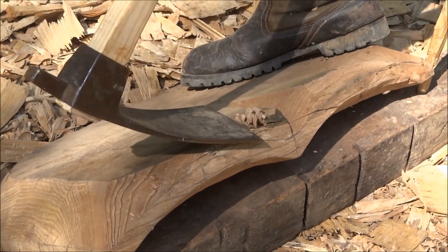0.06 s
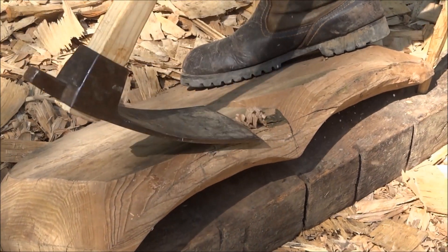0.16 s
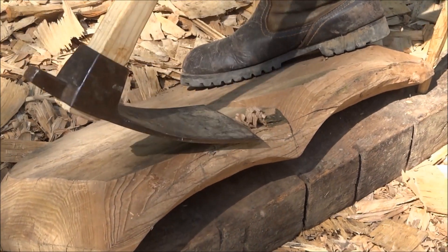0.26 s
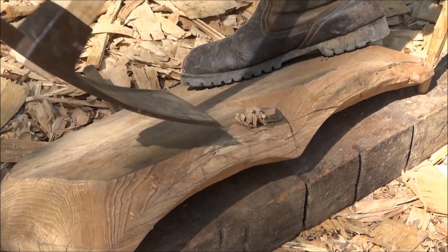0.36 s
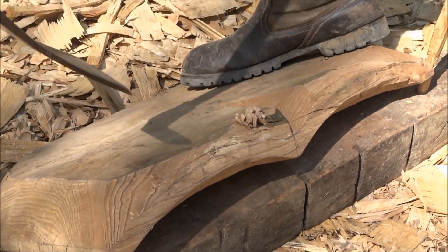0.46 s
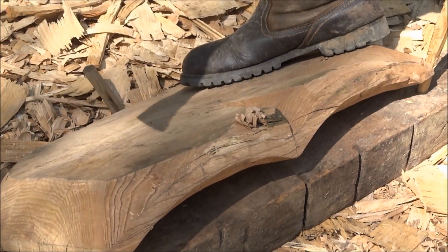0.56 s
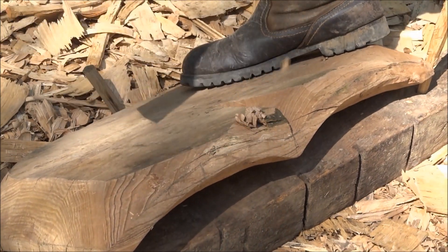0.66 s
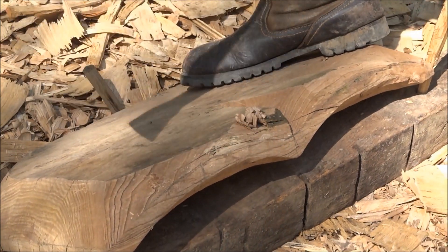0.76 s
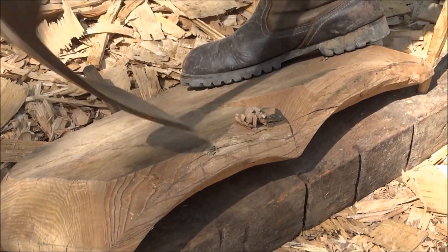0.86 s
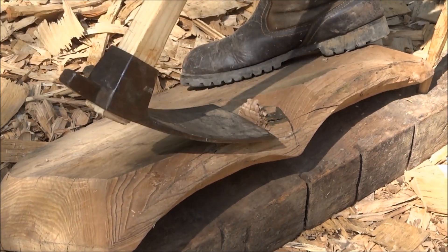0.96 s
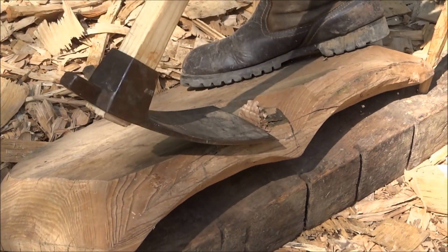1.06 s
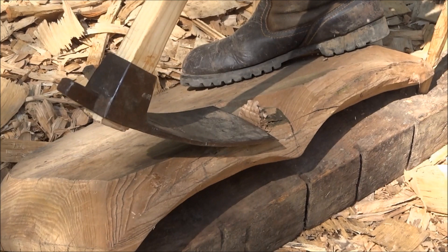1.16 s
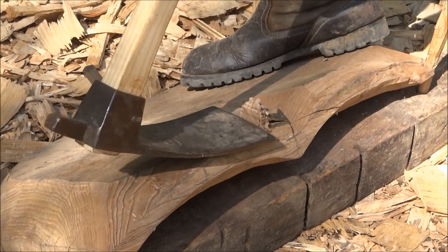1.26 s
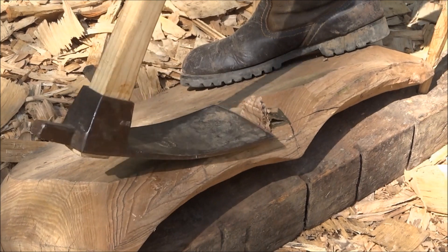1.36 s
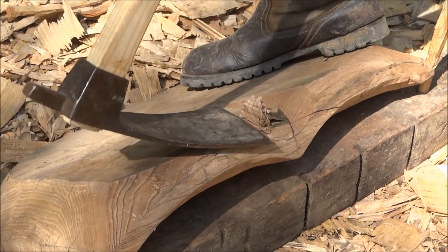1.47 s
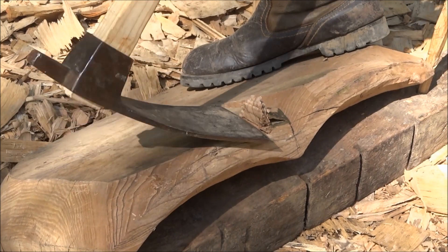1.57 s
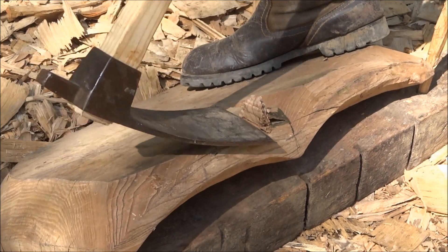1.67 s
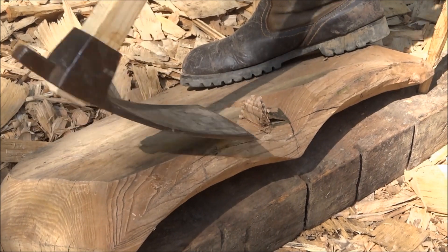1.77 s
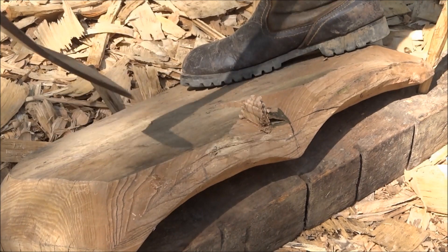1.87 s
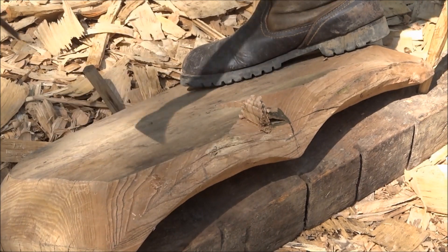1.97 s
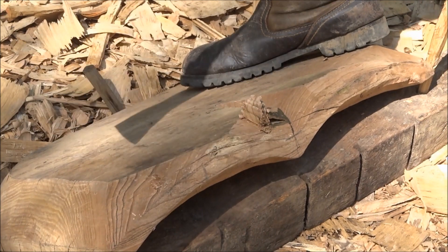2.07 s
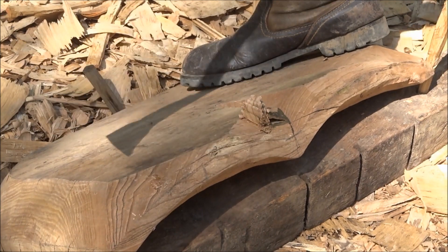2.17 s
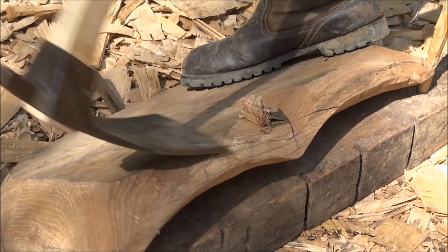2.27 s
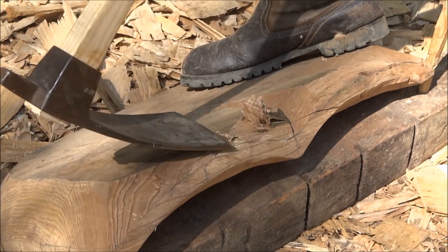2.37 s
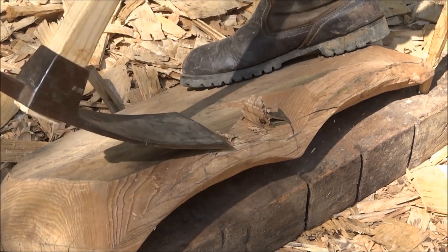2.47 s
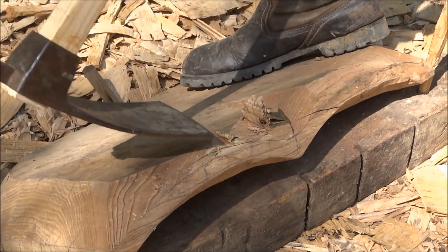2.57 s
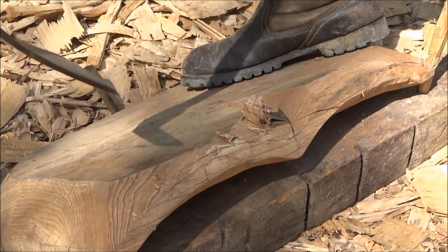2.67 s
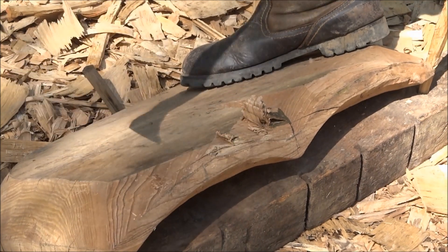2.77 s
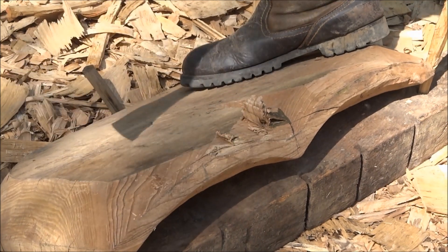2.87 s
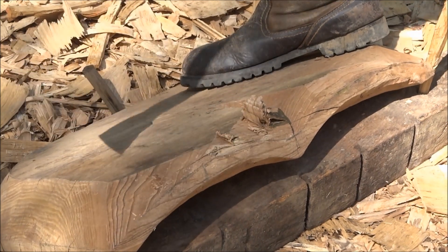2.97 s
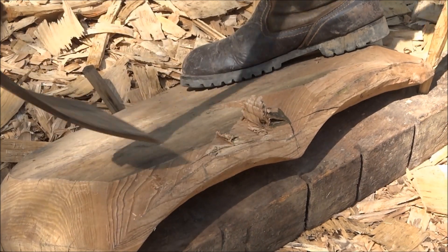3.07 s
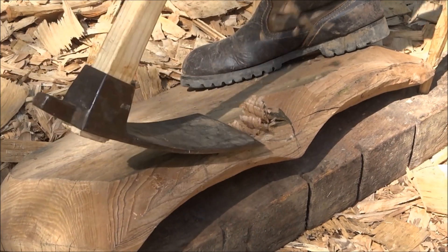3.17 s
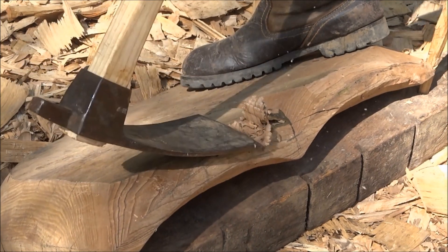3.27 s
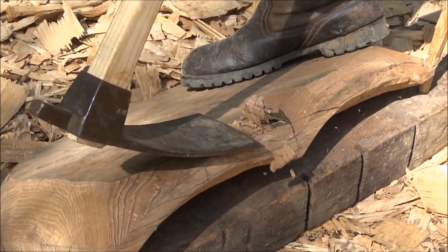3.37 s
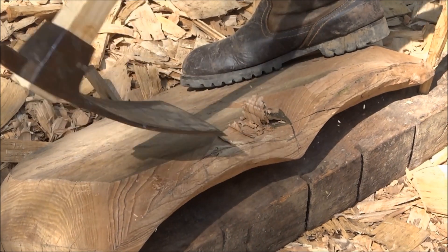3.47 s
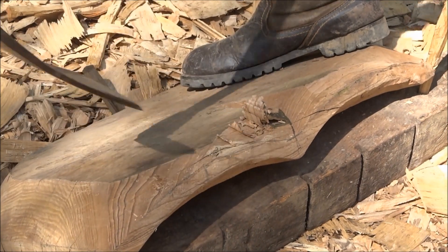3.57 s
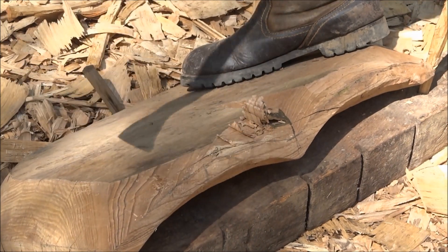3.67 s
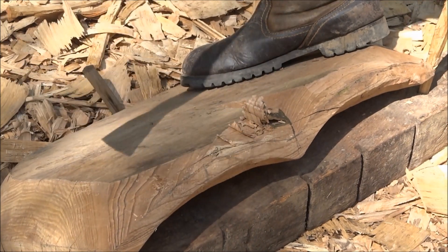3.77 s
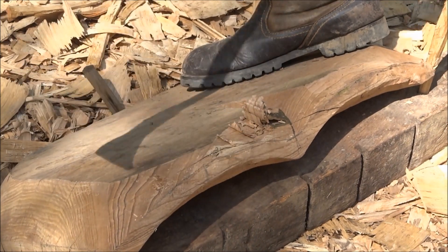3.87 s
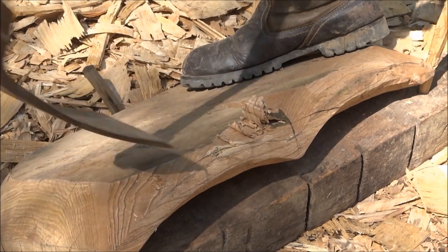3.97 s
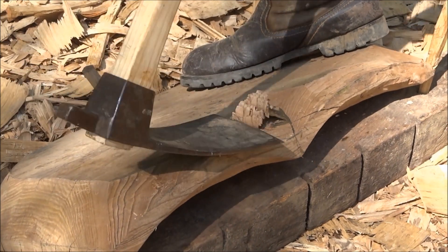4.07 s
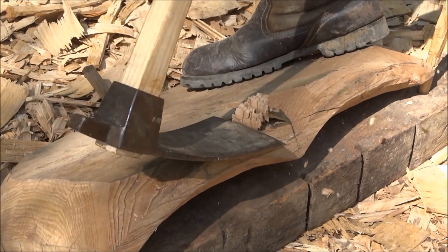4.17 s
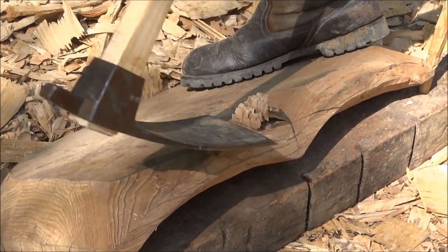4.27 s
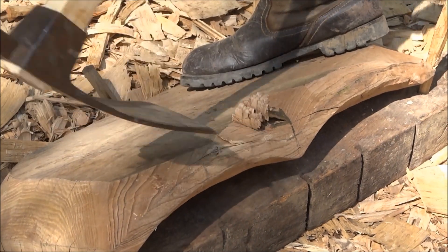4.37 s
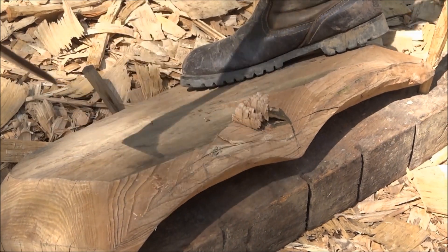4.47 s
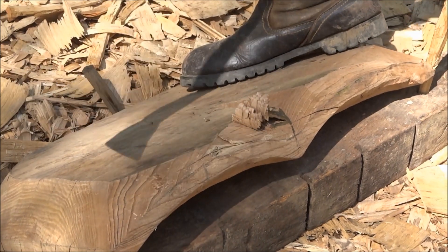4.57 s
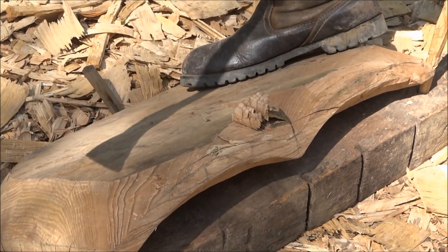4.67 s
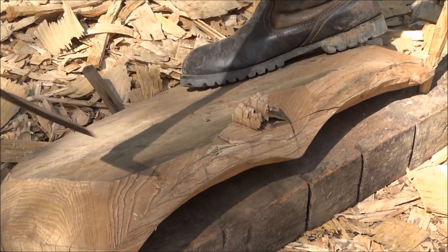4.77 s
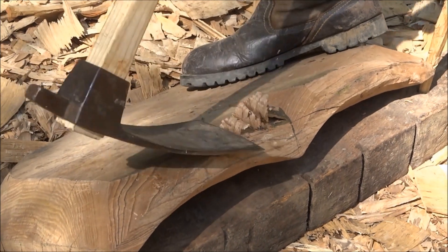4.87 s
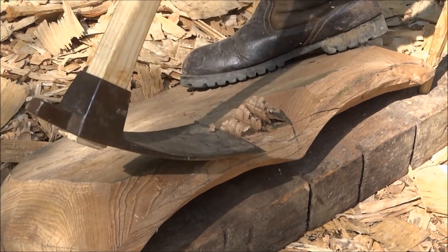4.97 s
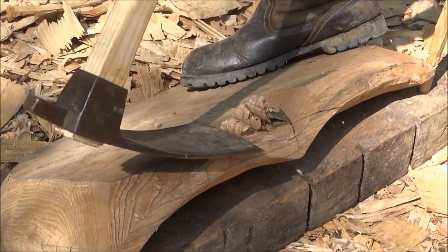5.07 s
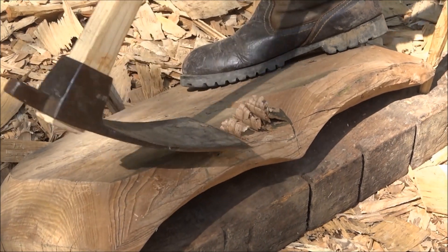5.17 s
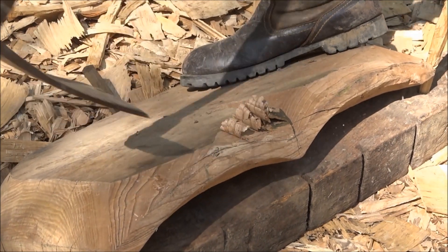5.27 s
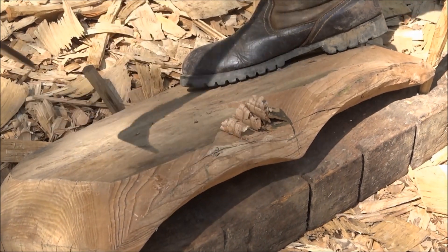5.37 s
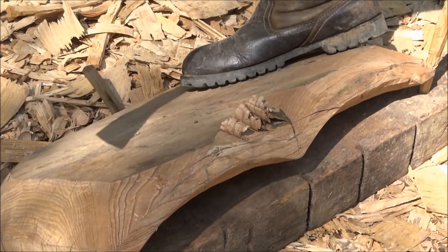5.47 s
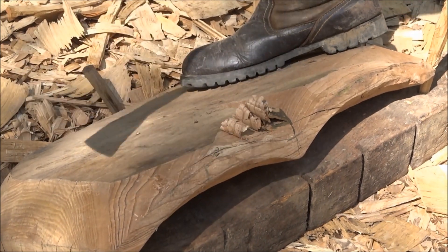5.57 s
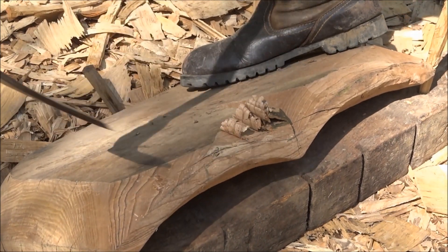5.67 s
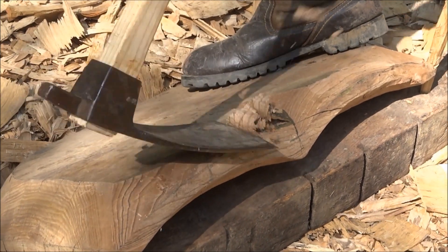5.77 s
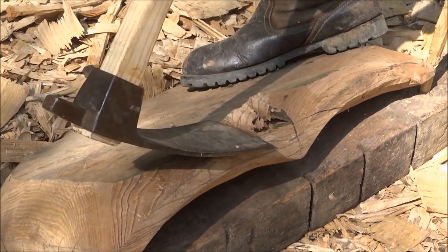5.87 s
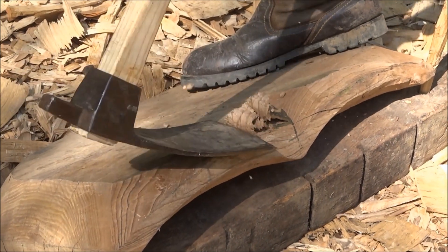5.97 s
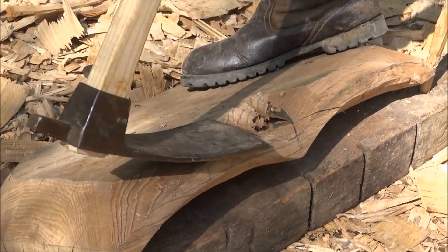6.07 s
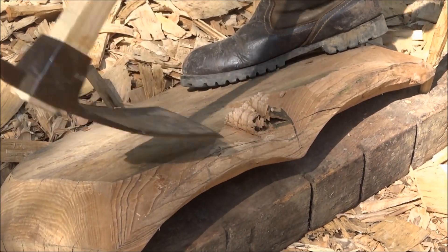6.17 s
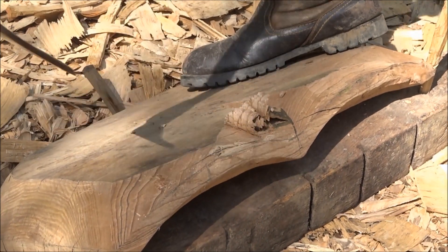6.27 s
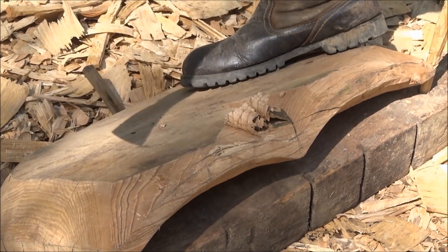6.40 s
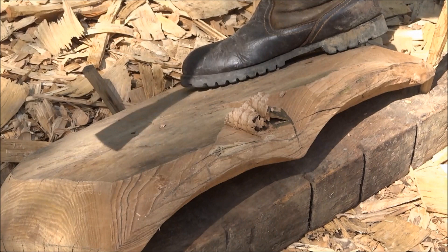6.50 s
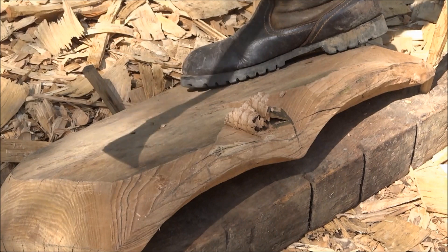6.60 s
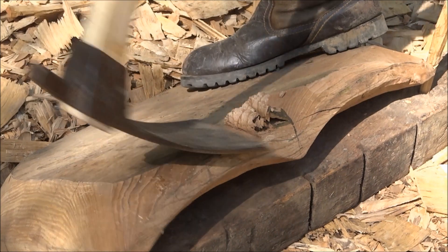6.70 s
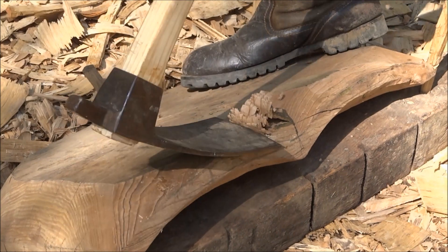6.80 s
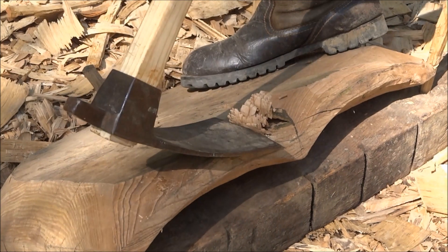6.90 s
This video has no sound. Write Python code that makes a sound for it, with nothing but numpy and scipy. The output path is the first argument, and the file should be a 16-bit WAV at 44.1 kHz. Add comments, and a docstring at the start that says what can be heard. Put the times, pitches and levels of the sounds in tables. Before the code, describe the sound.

Outdoors, close to the work, an adze blow is landing at 0 s: a gritty tear of fibres and a low, damped board thud. The loose board chatters hollowly at 0.1-0.3 s, with a bright crack at 0.36. The second blow falls at 0.9; around 1.3 a splinter tears away in a harsh creak and very sharp cracks, followed by low rubs. Further blows come at 2.3, 3.2, 4.0, 4.9, 5.8 and a heaviest one at 6.7, with another softer board rattle after 3.2 and small snaps and crumb ticks between. Thin distant birds trill from 0.5 to 1.7, then whistle sparsely. From 5.0 a near songbird swells into quick rising chirps, with thin high notes around 5.5-5.7, looping notes from 6.0 and a falling flourish at 6.8. Faint low air and leaf hiss remain; a wall and trees return dull, soft echoes.

```python
"""A hand adze chops a thick board held down on a beam, outdoors: noise tears as fibres part, then the board thuds.
Twice the loose board chatters and rings, as a sum of fading tones; wood cracks sharply in short bursts of noise.
A long splinter tears free, the work rubs under the boot, and crumbs of wood tick among the shavings.
A songbird whistles bending notes close by and others sing farther off, over a faint background of coloured noise.
A wall gives dull echoes, and the yard and trees answer with fading noise tails."""
import sys
import numpy as np
from scipy import signal
from scipy.fft import rfft, irfft, next_fast_len
from scipy.io import wavfile
from scipy.ndimage import map_coordinates

SR = 44100
rng = np.random.default_rng(int(sys.argv[2]) if len(sys.argv) > 2 else 0)


def to_wav(sig):
    """Store sig (one row per channel, or 1-D mono) as 16-bit WAV at the path in sys.argv[1].

    Samples outside -1..1 are clipped; the rate is SR.
    """
    pcm = np.clip(np.atleast_2d(sig), -1, 1) * 32767
    pcm = np.round(pcm).astype(np.int16)
    wavfile.write(sys.argv[1], SR, pcm.T)  # frames by channels


N = 306054  # length in samples

# The blows of the adze. Each row: time the blade enters in seconds, cutting time in seconds, crackle level in dB,
# extra force in dB, time from thud to bounce in seconds, bounce level against the thud in dB.
BLOWS = [(-.009, .0089, -14, 0, .015, -12), (.9093, .011, -18, .5, .011, -2.5),
         (2.3273, .010, -12, .3, .0108, -7), (3.158, 0.014, -12.5, -.5, .01, -7),
         (4.0405, .012, -14.5, -3, 0.0081, 1.5), (4.869, 0.0131, -14, .7, 0.0164, -12),
         (5.777, 0.0098, -14, -.5, .017, -11), (6.728, 0.011, -12.5, 5, .0135, -17.5)]
# The wood around the cut, as a noise colour. Each row: frequency in Hz, relative level in dB.
KNOCK = [(20, -38), (60, -2.5), (150, -9.5), (270, -14), (370, -2), (480, -2), (680, 2), (950, -2.5),
         (1120, -9.5), (1400, -4.5), (1900, -17.5), (4000, -19), (8000, -64)]
# The steel blade, damped by the wood. Each row: frequency in Hz, level in dB, seconds to fade by 60 dB.
STEEL = [(1321, -5, 0.066), (1515, -4.5, 0.13), (2555, -4.5, .12), (3930, 1, 0.12), (5750, -6, 0.066),
         (6800, -9, 0.13)]

# Bird syllables, each made of a few whistled arcs. Each row: start within the syllable in seconds, length in seconds,
# start, middle and end pitch in Hz, level in dB, depth of the buzz as a share of the pitch.
CHIP = [(0, .017, 4750, 4450, 2850, -1.5, 0), (.015, .013, 3800, 4650, 5050, -3, 0.02)]
RISE = [(0, .022, 2950, 3450, 4100, -3.5, 0), (.009, .028, 3700, 4250, 4200, 2, 0.0046)]
LOOP = [(0, .029, 4350, 4100, 3650, -1.5, 0.12), (.019, .031, 3600, 2820, 2330, -2.5, .025),
        (.054, .04, 2980, 3260, 3080, -.3, .018)]
FLOURISH = [(0, 0.0199, 2900, 4400, 4500, -1.5, 0), (.015, .022, 4210, 3700, 3680, 0.5, 0.085),
            (.034, .035, 2950, 3150, 2350, -0.5, 0), (.06, .05, 2700, 2304, 2000, -10.5, 0.065)]
SWEEP = [(0, .026, 5700, 6500, 6550, 1, .06), (.016, .032, 6900, 4750, 3700, 1, .06)]
SEEP = [(0, .072, 8100, 7130, 7900, 0, 0)]
SLUR = [(0, .075, 7300, 6750, 6200, 0, 0)]
WHISTLE = [(0, .04, 3000, 3060, 3050, 0, 0), (.02, .08, 3050, 3030, 2990, -3.5, 0)]
DIP = [(0, .018, 4480, 4370, 4150, -4, 0), (.011, .035, 4100, 3720, 3550, 0, .018)]

TOP_HZ = 16424  # nothing sounds above this pitch


def amp(db):
    """Turn decibels into a gain."""
    return 10 ** (np.asarray(db) / 20)


def unit(x):
    """Scale to an average strength (rms) of 1."""
    return x / np.sqrt(np.mean(x ** 2) + 1e-20)


def along(points, hz):
    """Read a curve of (Hz, value) points, with frequency on a logarithmic axis."""
    f, v = np.transpose(points)
    return np.interp(np.log(hz + 1), np.log(f + 1), v)


def add(track, s, x):
    """Mix x into the track from second s on, leaving out what falls outside."""
    i = round(s * SR)
    x = x[max(-i, 0):N - i]
    track[max(i, 0):][:len(x)] += x


def filtered(x, response):
    """Multiply the spectrum of x by a response that depends on frequency."""
    n = x.shape[-1]
    m = next_fast_len(n + 8192)  # spare room, so delayed sound does not wrap round to the start
    return irfft(rfft(x, m) * response(np.fft.rfftfreq(m, 1 / SR)), m)[..., :n]


def noise(spectrum, size):
    """Noise coloured by a spectrum, with an rms of 1."""
    white = rng.standard_normal(size)
    return unit(filtered(white, lambda hz: amp(along(spectrum, hz))))


def resonance(x, hz, q):
    """Pass x through one damped resonance, which favours sound near hz; a high q is narrow."""
    return filtered(x, lambda f: 1j * f * hz / q / (hz * hz - f * f + 1j * f * hz / q))


def wobble(rate, size):
    """A smooth random curve through rate random points a second."""
    points = rng.standard_normal(int(size * rate / SR) + 4)
    return map_coordinates(points, [np.arange(size) * rate / SR])


def ring(modes, t, scatter_db=2, detune=0.0092):
    """Sum the fading tones of a struck body, with new strengths and slightly new pitches for every contact."""
    total = 0
    for hz, db, t60 in modes:
        fade = amp(db + rng.normal(0, scatter_db) - 60 * t / t60)
        total = total + fade * np.sin(2 * np.pi * hz * rng.normal(1, detune) * t)
    return total


def spread(pair, width):
    """Turn a middle and a side signal into left and right."""
    middle, side = pair
    return np.array([middle + width * side, middle - width * side])


def reverb(x, decay, delay, width):
    """A diffuse answer: a noise tail in which each frequency dies away at its own speed."""
    hz, t, z = signal.stft(rng.standard_normal((2, SR)), SR, nperseg=256)
    fade = amp(-60 * t / along(decay, hz)[:, None])
    tail = signal.istft(z * fade, SR, nperseg=256)[1]
    tail = np.pad(tail / np.linalg.norm(tail[0]), ((0, 0), (int(delay * SR), 0)))
    return signal.fftconvolve(x[None], spread(tail, width), axes=1)[:, :N]


def wall(x, delay, dull_hz):
    """One reflection from a flat surface: x comes later and duller."""
    return filtered(x, lambda f: np.exp(-2j * np.pi * f * delay) / (1 + 1j * f / dull_hz))


def breeze():
    """Low outdoor rumble and leaf hiss, made of coloured noise that slowly swells and sinks."""
    # Colour of the air noise. Each row: frequency in Hz, relative level in dB.
    air = [(12, -52.5), (20, -15.5), (94, 0.5), (571, -20), (966, -19.5), (1210, -25.5), (1640, -21),
           (2220, -25), (3970, -24), (5240, -26.5), (6720, -23.5), (8860, -33), (11700, -29), (15000, -37)]
    # Course of the background loudness; the louder start is probably the first blow dying away.
    # Each row: time in seconds, level in dB.
    levels = [(0, -39), (.7, -45), (1.4, -45), (2.1, -48.5), (2.901, -47.5), (3.8, -45), (4.6, -45),
              (6.94, -46.5)]
    # Breadth of the outdoor air. Each row: frequency in Hz, side to middle ratio before the overall width.
    breadth = [(60, 0.023), (250, 0.32), (1000, 1), (5000, 0.52), (9000, 0.091)]
    level = np.interp(np.arange(N) / SR, *np.transpose(levels)) + .9 * wobble(5, N)
    side = filtered(noise(air, N), lambda hz: along(breadth, hz))
    return amp(level) * spread([noise(air, N), side], width=0.86)


def arc(length, pitches, buzz, waver, flutter_db):
    """One whistle that swells and fades while its pitch bends smoothly, never twice quite the same."""
    buzz_hz = 190.7
    overtone_hz, overtone_width = 4300, .12  # the throat favours the third harmonic of notes near this pitch
    fullness = 0.79  # lower values bring the arc to full voice sooner
    t = np.arange(int(length * SR)) / SR
    u = t / length  # runs from 0 to 1 over the arc
    bend = np.polyval(np.polyfit([0, .5, 1], np.log(pitches), 2), u)  # curve through the three pitches
    quiver = buzz * np.sin(2 * np.pi * (buzz_hz * t + rng.random()))
    pitch = np.exp(bend + quiver + waver * wobble(313, len(t)))
    phase = 2 * np.pi * np.cumsum(pitch) / SR
    second = np.sin(2 * phase) * (2 * pitch < TOP_HZ)
    third = np.sin(3 * phase) * (3 * pitch < TOP_HZ)
    favour = 1 / (1 + (np.log(pitch / overtone_hz) / overtone_width) ** 2)
    tone = np.sin(phase) + amp(-36.5) * second + amp(-28) * third * favour
    return tone * amp(flutter_db * wobble(242, len(t))) * np.sin(np.pi * u) ** fullness


def trills(rows):
    """Repeat each syllable evenly while it swells; gives (syllable, seconds, dB, pitch ratio) rows."""
    swell_s = 0.27  # a trill closes in on its full level with this time constant
    calls = []
    for shape, start, end, period, db, softer_db in rows:
        for s in np.arange(start, end, period):
            calls.append((shape, s, db - softer_db * np.exp((start - s) / swell_s), 1))
    return calls


def sing(calls, waver, flutter_db, drift):
    """Whistle every arc of every syllable, each a little off in pitch."""
    out = np.zeros(N)
    for shape, s, db, ratio in calls:
        for lag, length, *pitches, arc_db, buzz in shape:
            pitches = ratio * np.exp(drift * rng.standard_normal()) * np.array(pitches)
            add(out, s + lag, amp(db + arc_db) * arc(length, pitches, buzz, waver, flutter_db))
    return out


def far_birds():
    """Thin, wavering trills and single calls from the trees, made of whistled arcs."""
    # Trills. Each row: syllable, start and end in seconds, seconds between syllables,
    # full level in dB, how many dB softer at the start.
    far_trills = [(SWEEP, .533, .9, .0675, -35.5, 8), (SWEEP, 1.02, 1.33, .088, -38, 0.9),
                  (SWEEP, 1.412, 1.58, .048, -38, 1), (DIP, 1.62, 1.71, 0.051, -31.5, 0),
                  (SLUR, 3.385, 3.75, .142, -47, 0), (SLUR, 4.2, 4.7, .19, -46, 4.8),
                  (SLUR, 5, 5.3, .21, -45, 0)]
    # Single calls. Each row: syllable, start in seconds, level in dB, pitch ratio.
    far_calls = [(SLUR, .415, -48, .78), (SLUR, 1.72, -44.5, .9), (SLUR, 1.85, -47, 0.97),
                 (SLUR, 2.135, -43.5, 1.1), (WHISTLE, 2.655, -45.5, 1.2), (SLUR, 2.91, -49.5, 1.2),
                 (WHISTLE, 3.365, -37.5, 1.01), (WHISTLE, 3.68, -50, .82), (WHISTLE, 3.9, -47, .565),
                 (WHISTLE, 3.975, -40, .685), (WHISTLE, 5.82, -32, 2.03), (WHISTLE, 6.11, -30, 1.47),
                 (SLUR, 6.25, -32, .72), (SLUR, 6.31, -32, .68)]
    trilled = sing(trills(far_trills), waver=.017, flutter_db=3.5, drift=.018)
    return trilled + sing(far_calls, waver=.014, flutter_db=3, drift=.003)


def near_birds():
    """Whistled trills that swell and lead into a falling flourish, and a second bird's thin high notes."""
    # The near song. Each row: syllable, start and end in seconds, seconds between syllables,
    # full level in dB, how many dB softer at the start.
    song = [(RISE, 4.994, 5.95, .1472, -17.3, 17), (CHIP, 5.081, 5.89, .1475, -17.5, 11),
            (LOOP, 5.968, 6.68, .1288, -17, 1.9), (FLOURISH, 6.778, 6.85, .15, -14, 0)]
    # The second bird. Each row: start in seconds, level in dB, pitch ratio.
    thin_notes = [(5.345, -33, .8), (5.506, -23, 1.007), (5.618, -21, 1.02), (5.685, -17.5, 0.99)]
    seeps = [(SEEP, *row) for row in thin_notes]
    sung = sing(trills(song), waver=.01, flutter_db=2.7, drift=.004)
    return sung + sing(seeps, waver=0.0067, flutter_db=1.5, drift=.003)


def crumbs(rate=16, db=-47, scatter_db=4):
    """Splinters land and settle among the dry shavings: rate short noise ticks a second, at chance times."""
    out, t = np.zeros(N), np.arange(SR // 40) / SR
    for when, chance, pitch in rng.random((int(rate * N / SR), 3)):
        grain = resonance(rng.standard_normal(len(t)), hz=5000 * 2.4 ** pitch, q=0.98)
        tick = unit(grain) * amp(-60 * t / 0.03)
        add(out, when * N / SR, amp(db - scatter_db * np.log(max(chance, .03))) * tick)
    return out


def shifts():
    """Rubs of noise around one pitch, as boot, board and shavings shift against each other."""
    # Rubs. Each row: start in seconds, level in dB, length in seconds, pitch in Hz.
    rubs = [(.295, -47, .035, 10900), (1.25, -29.5, 0.02, 202), (1.296, -31, 0.029, 280),
            (1.53, -47, 0.088, 453), (1.925, -35.5, .09, 340), (3.42, -40.5, 0.042, 10300),
            (4.5, -53, 0.29, 10000), (6.09, -40, 0.02, 684), (6.585, -39, 0.029, 390)]
    out = np.zeros(N)
    for s, db, length, hz in rubs:
        n = int(length * SR)
        rub = resonance(resonance(rng.standard_normal(n), hz, q=2.2), hz, q=2.2)
        add(out, s, amp(db) * np.hanning(n) * unit(rub))
    return out


def splinter():
    """A long splinter is levered off: tearing jerks build, hold and stop, and ring the splinter."""
    # The splinter and the blade under it. Each row: frequency in Hz, level in dB, seconds to fade by 60 dB.
    modes = [(244, -14, .12), (690, -7, .06), (805, -4, .063), (1060, -8, .035), (1520, -6, .04),
             (2213, -15, .06), (2530, -5, .09), (3800, -6, .012)]
    full_s, build_s, hold_s, release_s = 1.291, .02, .011, .025  # time of full load, then lengths, in seconds
    out, t = np.zeros(N), np.arange(SR // 4) / SR
    held = t - build_s
    load = np.clip(t / build_s, 0, 1) ** 2.5 * amp(-60 * np.maximum(held - hold_s, 0) / release_s)
    jerks = load * unit(amp(4 * wobble(1500, len(t))) * rng.standard_normal(len(t)))
    body = ring(modes, t)
    rung = signal.fftconvolve(jerks, body / np.linalg.norm(body))[:len(t)]
    add(out, full_s - build_s, rung + amp(-6) * jerks)
    return amp(-20) * out


def loose_chips(count=2):
    """Small chips come loose as the blade is drawn out: faint snaps at chance moments after every blow."""
    after_s, spread_s = .25, 0.46  # earliest time after the blow, and the span that follows, in seconds
    crack_db, woody_db, scatter_db, hz = -36, -45, 4, 3000
    rows = []
    for s, *_ in BLOWS:
        for when, size in rng.random((count, 2)):
            db = scatter_db * (2 * size - 1)
            rows.append((s + after_s + spread_s * when, crack_db + db, woody_db + db, hz))
    return [row for row in rows if row[0] < N / SR]


def snaps():
    """Wood breaks with a bright crack of noise and a short woody ring at its own pitch."""
    # Sharp cracks of wood: the blade's first bite at some blows, and chips or splinters breaking.
    # Each row: start in seconds, crack level in dB, woody level in dB, woody pitch in Hz.
    sharp_cracks = [(.105, -35, -22.5, 1800), (0.3552, -12.5, -40, 2500), (.409, -45, -27, 2380),
                    (.552, -23, -34, 3040), (0.9131, -11, -8.5, 1460), (1.2625, -7.5, -25, 3560),
                    (1.291, -10.5, -15, 1420), (1.2982, -3, -17, 840), (1.4795, -20, -30, 4300),
                    (2.687, -23, -42, 3540), (2.7572, -29, -47, 3000), (3.055, -28, -47, 3000),
                    (3.513, -24, -29, 3200), (3.5425, -30, -9, 3100), (3.889, -29, -16, 1730),
                    (4.0397, -3.5, -18.5, 1500), (4.2787, -25, -29, 4000), (4.304, -30, -35, 3350),
                    (5.7782, -9, -11.5, 1510), (6.086, -26, -26, 2970), (6.236, -18, -26, 3000),
                    (6.4736, -21, -40, 3000)]
    out, t = np.zeros(N), np.arange(SR // 8) / SR
    for s, crack_db, woody_db, hz in sharp_cracks + loose_chips():
        white = rng.standard_normal((2, len(t)))
        fade = amp(-60 * t / 0.0035) + amp(-22.5 - 60 * t / 0.094)  # a fast drop, then a faint tail
        crack = unit(resonance(white[0], hz=9300, q=0.92)) * fade
        wood = unit(resonance(white[1], hz, q=0.79)) * amp(-60 * t / 0.021) * (1 - np.exp(-t / .0005))
        blade = amp(-26) * ring(STEEL, t, scatter_db=7.0)  # the blade's edge rings a little
        add(out, s, amp(crack_db) * crack + amp(woody_db) * (wood + blade))
    return out


def chatter(count=2):
    """Free of the boot's weight, the board rocks on the beam, bounces at each landing and rings on."""
    # Bending modes of the loose board. Each row: frequency in Hz, level in dB, seconds to fade by 60 dB.
    board = [(224.2, -6, 0.344), (388, 2.5, 0.23), (542, -9.5, 0.22), (593, -5, 0.12), (704, -12.5, 0.21),
             (830, -5, 0.2), (927.7, 2.5, 0.23), (1537, -10.5, 0.16), (3946, -27, 0.17)]
    # Spells of rocking. Each row: first contact in seconds, level in dB, seconds between rocks, dB lost per rock.
    spells = [(.113, -18, .093, 8.5), (3.187, -25, .101, 3)]
    rebound_s, rebound_db = .031, -3.8  # time and change of level from one contact of a rock to the next
    out, t = np.zeros(N), np.arange(SR // 2) / SR
    for s, db, rock, loss_db in spells:
        for k in range(count):
            for j in range(count + 1):
                knock = amp(-2.0 - 60 * t / 0.063) * noise(KNOCK, len(t))
                contact = (1 - np.exp(-t / 0.0011)) * (ring(board, t, detune=0.015) + knock)
                level = amp(db - k * loss_db + j * rebound_db)
                add(out, s + k * rock + j * rebound_s, level * contact)
    return out


def thud(t, hz, width):
    """The held board swings for a few cycles around t = 0, swelling and dying away."""
    return -np.cos(2 * np.pi * hz * t) * np.exp(-.5 * (t / width) ** 2)


def chops():
    """The blade tears fibres until it sticks; then the board is driven down, bounces and shudders."""
    # Colour of tearing fibres. Each row: frequency in Hz, relative level in dB.
    tear = [(300, -10), (1300, -0.5), (2200, -2), (3800, 0.5), (6000, 1), (12000, 3.5), (16000, -8)]
    # Colour of the shudder of board and beam. Each row: frequency in Hz, relative level in dB.
    shaking = [(25, -21), (80, -7), (135, -5), (175, -2.5), (280, -5.5), (440, -7), (600, -5.5),
               (800, -17.5), (1200, -18.5), (2000, -22), (4000, -23), (14000, -31)]
    # Board and beam pressed together under the boot. Each row: frequency in Hz, level in dB,
    # seconds to fade by 60 dB.
    beam = [(171.4, -6.5, 0.27), (206.1, -2, 0.23), (280, -2, 0.087), (608, -6, 0.24), (783, -6, 0.15),
            (1376, -19, 0.22)]
    knock_db, thud_db = -14.6, -4  # levels at a blow of ordinary force
    out, t = np.zeros(N), np.arange(SR // 2) / SR
    for s, cutting, crackle_db, force_db, bounce, bounce_db in BLOWS:
        bite = np.clip(t / 0.0027, 0, 1) * amp(-60 * np.maximum(t - 0.73 * cutting, 0) / 0.014)
        crackle = unit(amp(2.3 * wobble(1850, len(t)))) * noise(tear, len(t))  # fibres part in tiny jerks
        pressure = np.clip(t / 0.0017, 0, 1) * amp(-60 * np.maximum(t - cutting, 0) / 0.024)
        knock = amp(knock_db + force_db) * pressure * noise(KNOCK, len(t))
        blade = amp(-32) * ring(STEEL, t, scatter_db=4)
        cut = amp(crackle_db) * bite * crackle + blade + knock

        stuck = t - cutting - .004  # the thud is centred 4 ms after the cutting time
        push = thud(stuck, hz=249.0, width=0.0027)
        push = push + amp(bounce_db) * thud(stuck - bounce, hz=213.0, width=0.0035)
        shudder = amp(-17 - 60 * t / 0.37) * noise(shaking, len(t)) + amp(-17) * ring(beam, t, detune=0.013)
        rise = np.clip(t / cutting, 0, 1) ** 2
        add(out, s, cut + amp(thud_db + force_db) * (push + rise * shudder))
    return out


def scene():
    """The work is close up near the middle, the near birds a little to the left, with the answers of the place."""
    # How long the yard rings. Each row: frequency in Hz, seconds to fade by 60 dB.
    yard_decay = [(100, 0.25), (300, 0.64), (1000, 0.87), (4000, 0.93), (9000, 0.32), (15000, 0.36)]
    # How long the trees ring. Each row: frequency in Hz, seconds to fade by 60 dB.
    tree_decay = [(1000, 1.3), (4000, 1.19), (9000, 0.74)]
    work = chops() + chatter() + snaps() + splinter() + shifts() + crumbs()
    # the long board radiates its middle tones unevenly to the two sides
    sideways = resonance(work, hz=1200, q=0.36)
    close = spread([work, amp(-13.5) * wall(sideways, delay=0.00086, dull_hz=3000)], width=0.81)
    yard = amp(-13.5) * wall(work, delay=.0428, dull_hz=824)
    yard = yard + amp(-14) * reverb(work, yard_decay, delay=.012, width=0.23)

    near = near_birds()
    near = near + amp(-15.0) * wall(near, delay=0.025, dull_hz=5000)
    near_early = amp(-6) * reverb(near, [(3000, 0.22)], delay=.004, width=0.19)
    near_late = amp(-12.0) * reverb(near, tree_decay, delay=.02, width=0.23)
    near = amp(-2.5) * near + near_early + near_late

    far = far_birds()
    far_early = amp(-6.5) * reverb(far, [(3000, 0.073)], delay=.004, width=0.34)
    far_late = amp(-2) * reverb(far, tree_decay, delay=0.012, width=0.32)
    far = amp(-1.5) * far + far_early + far_late

    # the pairs are left and right levels in dB
    return (close + yard) * amp([[-.3], [.3]]) + near * amp([[1], [-1]]) + far + breeze()


def record(dry, ceiling=0.65):
    """Round off the loudest peaks below the ceiling and roll away the top treble."""
    # Overall tone. Each row: frequency in Hz, level in dB.
    tone = [(20, 4), (13500, -0.5), (15000, -3), (16400, -40)]
    squeezed = dry / (1 + np.abs(dry / ceiling) ** 8) ** (1 / 8)
    return filtered(squeezed, lambda hz: amp(along(tone, hz)) * (hz < TOP_HZ))


dry = scene()
out = record(dry)
to_wav(out)
```